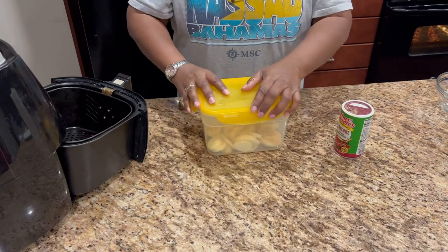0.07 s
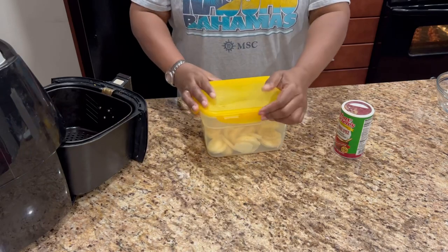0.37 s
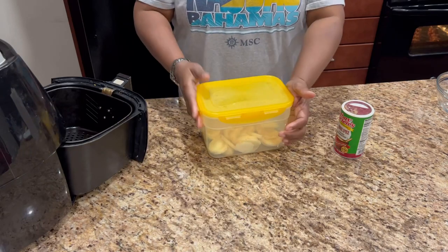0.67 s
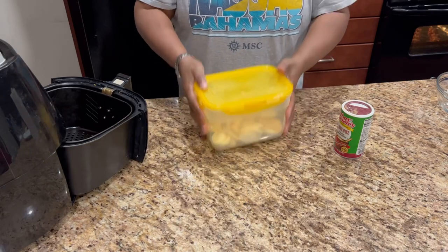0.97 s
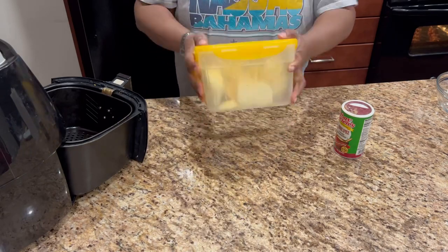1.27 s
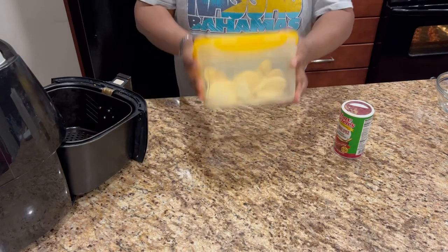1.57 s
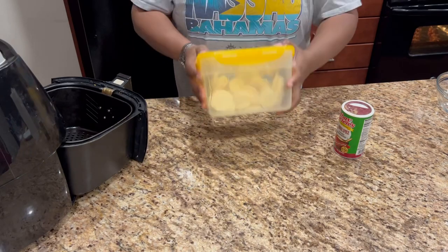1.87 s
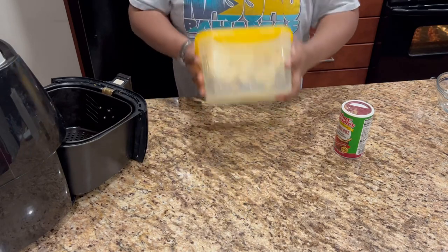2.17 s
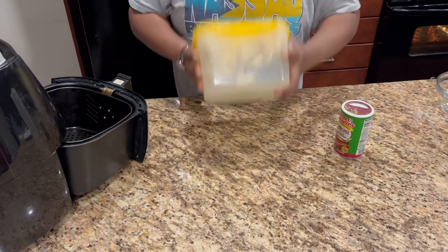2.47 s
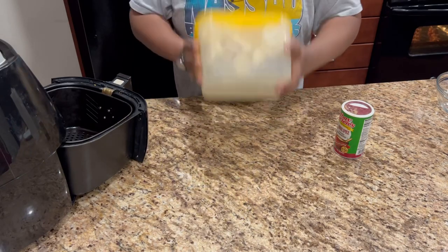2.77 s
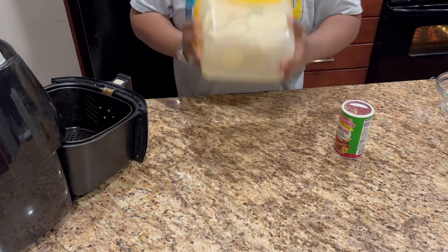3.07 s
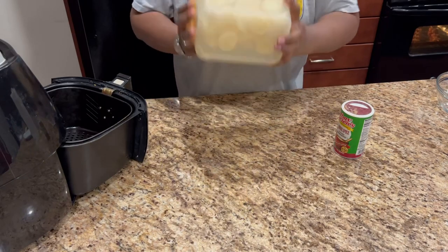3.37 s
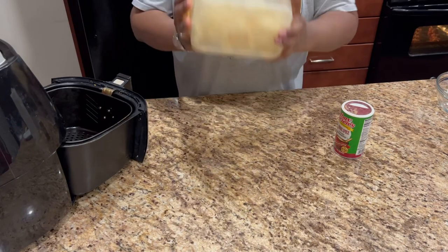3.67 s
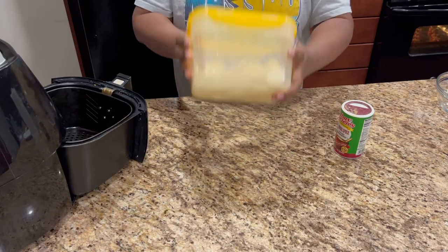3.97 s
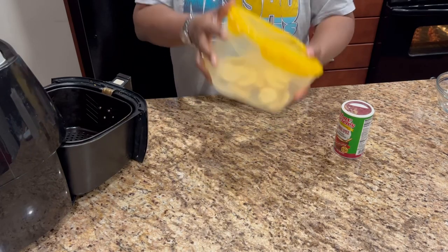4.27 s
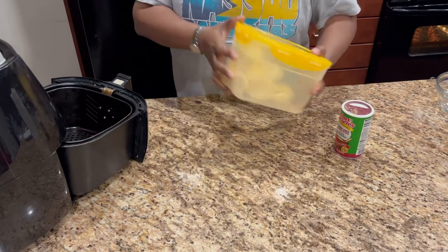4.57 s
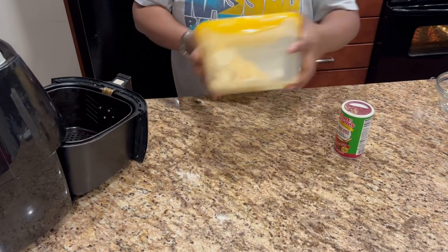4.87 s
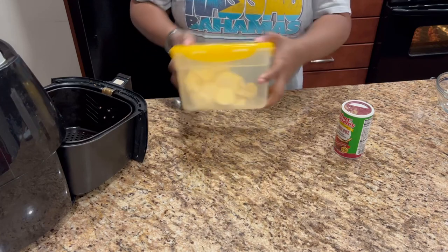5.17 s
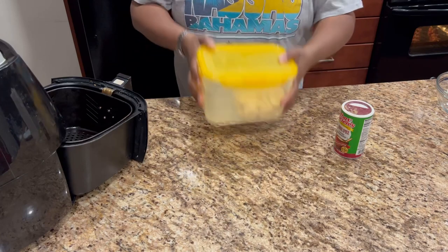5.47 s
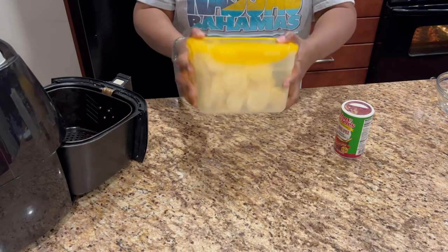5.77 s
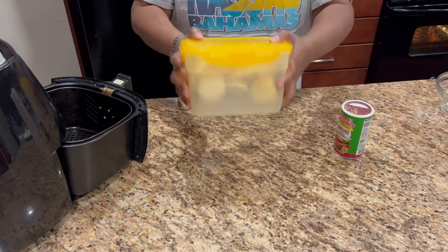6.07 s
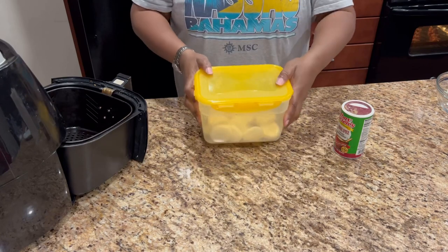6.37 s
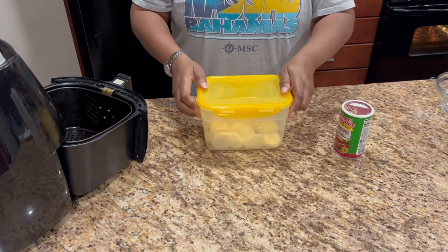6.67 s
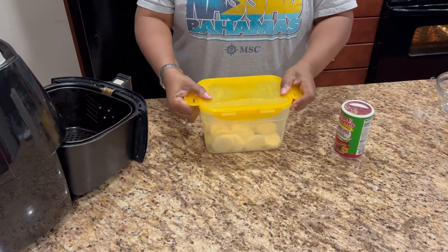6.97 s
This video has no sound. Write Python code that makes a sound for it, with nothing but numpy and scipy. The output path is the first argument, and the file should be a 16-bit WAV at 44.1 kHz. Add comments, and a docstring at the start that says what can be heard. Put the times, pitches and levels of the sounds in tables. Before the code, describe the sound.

Lid latches click closed, and damp chunks of food knock and tumble inside a hand-shaken plastic container, which is then set down.

```python
"""In a small, hard-walled kitchen, the four latches of a plastic food tub are snapped shut on the
counter. The tub is shaken by hand: moist chunks thump against its floor and lid about three times a
second, and tumble and squelch in between. Then it is set down and the latches are prised open.
Each thump is a plastic wall swinging; each clack is thin plastic flexing over the hollow tub.
The room rings behind it all, and appliances drone faintly."""
import sys
import numpy as np
from scipy import signal
from scipy.fft import rfft, irfft
from scipy.io import wavfile
from scipy.ndimage import uniform_filter1d

SR = 44100
rng = np.random.default_rng(int(sys.argv[2]) if len(sys.argv) > 2 else 0)


def int16_out(signal):
    """Quantize to a 16-bit WAV file."""
    q = np.round(np.clip(np.atleast_2d(signal).T, -1, 1) * 32767)
    wavfile.write(sys.argv[1], SR, q.astype(np.int16))


N = 309141
T = np.arange(SR // 6) / SR  # seconds within one hit

# Tone curves for the drone, the echo and the whole sound. Each row: frequency in Hz, gain in dB.
DRONE_TONE = [(25, -17), (58, 4), (85, -20), (145, 4.5), (250, -13), (470, 4.5), (700, -17.5), (1300, -17),
              (3000, -31.5), (7500, -29.5), (15000, -58)]
ECHO_TONE = [(60, -19.5), (100, -6.5), (135, 4.5), (185, 3.5), (228, 0), (262, -4), (320, -1.5), (420, 0.5),
             (700, -1), (1000, 0.5), (2000, 0.5), (3200, 3.5), (4300, 7), (5500, 7), (7500, -3.5),
             (14000, -5.5)]
OVERALL_TONE = [(20, -23), (60, 2.5), (7600, 2), (8700, 1.5), (9700, -16.5), (11000, -19.5),
                (13000, -9.5), (16000, -11.5)]
# Tone curves for food (slap, squelch) and plastic (knock, crack). Each row: frequency in Hz, gain in dB.
SLAP_TONE = [(60, -37), (300, -20), (700, 11.5), (1080, 1.5), (1320, 6), (1900, -4.5), (2700, -11.5),
             (4000, -19), (8000, -46)]
SQUELCH_TONE = [(1200, -15), (2800, 5.5), (4000, -2), (5500, 5.5), (7300, 13.5), (9000, 8), (15000, 5.5)]
KNOCK_TONE = [(250, -48), (600, -18.5), (950, 10.5), (1400, 7.5), (2000, 3), (2800, -5), (4500, -15.5)]
CRACK_TONE = [(1200, -15), (2000, -1), (2900, -8.5), (3800, -7), (4500, -5.5), (5300, -0.5), (6200, 3),
              (7300, 5), (8500, 3), (13000, -4), (16000, 2)]
# How long the kitchen rings. Each row: frequency in Hz, seconds to fade by 60 dB (called t60).
ECHO_TIMES = [(100, 0.5), (350, 0.33), (1000, 0.31), (3000, 0.38), (7000, 0.36), (14000, 0.14)]
# The notes the filled tub rings at. Each row: pitch in Hz, relative level in dB, t60 in seconds.
TUB_NOTES = [(135, -22.5, 0.19), (179.4, -18.5, 0.13), (222.9, -7, 0.099), (310.7, 1, 0.053),
             (372, 1, 0.035), (431.6, -5, 0.099), (528.3, -1, 0.064), (604.3, -5.5, 0.086),
             (746, 1.5, 0.012), (842, -10, 0.053), (1001, -20.5, 0.13), (1360, -29.5, 0.019)]
# Hand strokes that throw the food against the tub. Each row: landing time in seconds,
# landing length in seconds, relative level in dB, seconds of rolling beforehand.
HAND_STROKES = [(1.168, 0.057, -15.5, 0.0089), (1.447, 0.076, -19, 0.0064), (1.737, 0.1, -17, 0.038),
                (2.085, 0.11, -14.5, 0.072), (2.424, 0.11, -14, 0.044), (2.76, 0.089, -16.5, 0.2),
                (3.081, 0.13, -15, 0.11), (3.394, 0.088, -15.5, 0.041), (3.748, 0.097, -19, 0.092),
                (4.2, 0.093, -26.5, 0.032), (4.411, 0.051, -17.5, 0.02), (4.528, 0.046, -19, 0.032),
                (4.819, 0.011, -21.5, 0.027), (4.99, 0.053, -26, 0.015), (5.155, 0.0046, -18.5, 0.014),
                (5.339, 0.18, -33, 0.042), (5.659, 0.033, -21.5, 0.024), (5.75, 0.041, -18, 0.02),
                (5.85, 0.03, -33, 0.02), (5.96, 0.076, -18, 0.015), (6.06, 0.054, -15.5, 0.018),
                (6.181, 0.1, -24.5, 0.017)]
# Wet slices landing flat. Each row: start in seconds, relative crackle level in dB,
# relative slap level in dB, pitch of the trapped air in Hz.
WET_LANDINGS = [(2.038, -33, -34, 1390), (2.2166, -34, -30.5, 1510), (2.278, -38, -49, 1400),
                (2.32, -34, -35, 1170), (2.345, -27.5, -39, 1300), (2.5368, -24.5, -33, 1340),
                (2.7357, -24, -36, 1620), (3.3837, -28, -27, 1230), (3.4504, -27, -42, 1310),
                (3.554, -39, -36, 1500), (3.6913, -36, -35, 1320), (3.73, -28, -27, 1390),
                (4.2493, -33, -38, 1450), (4.2945, -45, -32, 1390), (4.421, -40, -31, 1350),
                (4.787, -41, -59, 1320), (4.825, -33, -40, 1300), (4.8433, -32, -29.5, 1320),
                (5.006, -37, -19, 1320), (5.253, -39, -49, 1390), (5.638, -56, -43, 1140),
                (5.6629, -49, -24, 1100), (5.7374, -40, -29, 1200), (5.962, -36, -27.5, 1500),
                (6.2712, -58, -36, 1180)]
# Dull blows from hands and heavy chunks. Each row: start in seconds, relative level in dB, wall pitch
# in Hz, slap strength in dB, length in wave cycles (the swell and the ring each take a share of it).
HEAVY_BLOWS = [(0.026, -18.5, 175, -34, 9.6), (0.117, -12.5, 253, -36, 8.3), (0.620, -39, 126, -27, 16),
               (0.9, -26, 303, -20, 15), (1.127, -25.5, 328, -28, 31), (1.168, -2, 327, -26.5, 33),
               (1.215, -9, 360, -21, 16), (1.261, -1.5, 478, -20.5, 17), (1.268, -6, 350, -13.5, 12),
               (1.291, -17.5, 436, -6, 19), (1.3, -19, 385, -19, 13), (1.448, -5.5, 475, -21, 13),
               (1.466, -11.5, 550, -12.5, 16), (1.525, -2.5, 468, -14, 16.4), (1.547, -10, 404, -9, 30),
               (1.634, -18, 335, -31, 15), (1.674, -21.5, 373, -30, 16), (1.711, -20, 410, -15, 36),
               (1.733, -2.5, 366, -22, 30), (1.752, -5.5, 386, -24, 13), (1.803, -5, 506, -23, 13),
               (1.818, -7.5, 335, -23, 15), (1.852, -3.5, 509, -18.5, 14), (1.865, -7.5, 372, -19.5, 21),
               (1.895, -17, 417, -29, 14), (2.033, -14, 333, -17.5, 24), (2.051, -18.5, 365, -19, 37),
               (2.078, -7.5, 423, -21, 19), (2.092, -9, 627, -25.5, 22), (2.099, -6, 362, -46, 26),
               (2.12, -10, 350, -33, 50), (2.159, -7, 374.4, -16.5, 20), (2.18, -10.5, 496, -10, 9.8),
               (2.192, -14, 423, -26, 12), (2.215, -15, 395, -12, 13), (2.237, -15, 520, -18, 13),
               (2.349, -19, 414, -15, 27), (2.377, -20.5, 360, -13, 20), (2.419, -11, 276, -10, 14),
               (2.430, -5, 355, -23, 15), (2.473, -2.5, 455, -18.5, 16), (2.496, -9.5, 408, -30, 35),
               (2.521, -11.5, 406, -11.5, 30), (2.536, -10, 375, -11, 25), (2.657, -12.5, 383, -15, 14),
               (2.698, -15, 333, -20.5, 20), (2.746, -7, 334, -21, 16.6), (2.768, -14.5, 290, -33, 31),
               (2.792, -8.5, 498, -13, 20), (2.813, -7, 433, -11.5, 25), (2.840, -7.5, 405, -19.5, 28),
               (2.854, -6, 392, -15, 20), (2.868, -12.5, 440, -18, 8.6), (3.019, -21, 476, -16, 20),
               (3.072, -11, 370, -32.5, 23), (3.085, -10.5, 430, -15, 17), (3.101, -13.5, 520, -15, 18),
               (3.127, -8.5, 446, -24.5, 38), (3.158, -11, 435, -17.5, 9), (3.181, -10.5, 383, -31, 31),
               (3.21, -15.5, 522, -10, 15), (3.277, -23, 430, -12, 15), (3.326, -17, 322, -23.5, 60),
               (3.401, -12.5, 387, -19.5, 25), (3.437, -14.5, 371, -37, 26), (3.460, -10, 396, -18, 22),
               (3.473, -9, 440, -17, 29), (3.495, -15, 450, -9, 12), (3.51, -7, 331, -20.5, 31.5),
               (3.551, -23, 423, -8, 27), (3.694, -16, 332, -23.5, 32), (3.749, -13, 365, -15, 15),
               (3.798, -5.5, 460, -19, 19), (3.815, -12.5, 478, -8.5, 26), (3.841, -4.5, 359, -16, 29),
               (3.862, -16.5, 455, -11.5, 18), (3.903, -24.5, 407, -13.5, 13), (4.143, -29.5, 316, -35, 25),
               (4.203, -18.5, 431, -34, 29), (4.271, -18.5, 370, -16, 20), (4.297, -16, 371, -22.5, 18),
               (4.316, -21, 300, -24.5, 15), (4.404, -16, 296, -33, 16), (4.432, -10.5, 365, -26, 22),
               (4.452, -16, 371, -10.5, 33), (4.535, -10.5, 585, -11, 32), (4.544, -8.5, 425, -21, 27),
               (4.565, -12, 380, -16, 20), (4.622, -21, 408, -12, 25), (4.636, -11, 363, -19, 33),
               (4.835, -19, 478, -6.5, 34), (4.979, -17.5, 328, -25, 21), (5.003, -15.5, 455, -24, 27),
               (5.012, -13, 463, -12, 11.5), (5.159, -15, 413, -14, 16), (5.281, -28, 325, -41, 24),
               (5.311, -24.5, 354, -34, 18), (5.379, -21, 412, -11, 26), (5.393, -17, 448, -11, 45),
               (5.432, -20, 378, -32, 42), (5.59, -24.5, 405, -17.5, 16), (5.641, -23, 333, -28, 43),
               (5.66, -20.5, 650, -12, 13), (5.673, -15.5, 780, -20.5, 19), (5.683, -16.5, 580, -14.5, 19),
               (5.751, -13.5, 448, -17.5, 22), (5.77, -11.5, 434, -13.5, 26), (5.793, -16, 430, -25, 21),
               (5.838, -16, 440, -20, 13), (5.857, -11, 325, -23.5, 14), (5.869, -16.5, 442, -17, 24),
               (5.898, -18, 372, -18, 25), (5.939, -17, 420, -21, 21), (5.968, -10, 343, -30, 12),
               (5.986, -15.5, 565, -14.5, 11), (5.999, -14.5, 407, -22.5, 16), (6.054, -10, 397, -24, 22),
               (6.068, -5, 392, -21.5, 18), (6.177, -16, 394, -33, 7.9), (6.245, -23.5, 417, -17, 25),
               (6.271, -25.5, 497, -13.5, 20), (6.534, -24.5, 474, -27, 11), (6.745, -19, 417, -35, 29),
               (6.947, -19, 475, -15, 13)]
# Clacks of latches, lid and base. Each row: start in seconds, body level in dB, body pitch in Hz,
# relative knock and crack levels in dB, contact time in seconds, left minus right in dB,
# extra dB towards the microphones, and a list of ringing notes as (Hz, dB compared with the snap).
PLASTIC_CLACKS = [(0.026, -10, 445, -24.5, -25, 0.0071, 1, 0.5, [(1900, -1), (3300, 0.5), (7400, 1)]),
                  (0.114, -11, 444, -24.5, -26.5, 0.013, 1.5, 1.5, [(2650, 2.5), (4600, 3.5), (6500, 4.5),
                  (7150, 4)]), (0.349, -26, 565, -34.5, -39, 0.089, 6, -11, []),
                  (0.389, -6.5, 456, -15, -21.5, 0.0088, -1, -0.5, [(1850, -11), (3800, 1), (5150, -2.5),
                  (7400, 2)]), (0.6175, -12, 530, -21.5, -22, 0.0085, 4, -5.5, [(800, 4.5), (2550, 4),
                  (3050, 7), (3950, -6), (7400, -15.5)]),
                  (1.52, -21.5, 460, -25, -38, .018, -2.5, -2.5, [(2100, -3.5)]),
                  (2.135, -8, 446, -32.5, -43.5, 0.03, -2, 3, []),
                  (2.801, -12, 385, -29.5, -43.5, 0.027, -1, 2, []),
                  (3.137, -11, 335, -26.5, -34.5, 0.01, 0, 0.5, [(6840, -2)]),
                  (3.742, -15, 290, -32, -45, 0.02, -5, -1, [(1230, -10.5)]),
                  (4.162, -29, 247, -38.5, -42.5, 0.0095, 0.5, 0, [(5100, 3)]),
                  (4.529, -7, 439, -28.5, -35.5, 0.012, 2, 0.5, [(3950, 9.5), (7300, -1)]),
                  (5.127, -38, 366, -47, -46.5, 0.046, 0, -6, []),
                  (5.341, -23, 380, -38, -52, 0.01, -2, -4, []),
                  (6.09, -13.5, 307, -21.5, -48, 0.01, -1, -5, [(5400, 2)]),
                  (6.11, -15.5, 320, -38.5, -54, 0.01, 2, 9.5, [(5650, 14), (6400, 7.5)]),
                  (6.505, -15.5, 345, -34.5, -42.5, 0.01, 1, -3.5, [(7700, 4)]),
                  (6.736, -32.5, 394, -48, -44, 0.013, 0, -0.5, [(1900, 17.5), (7500, -8)]),
                  (6.929, -13, 594, -35.5, -49.5, 0.0055, -3, 0, [(3300, -1), (7600, 8.5)]),
                  (6.947, -30, 470, -35.5, -50.5, 0.03, -1, 2.5, [])]

SHAKING_S = (1.11, 6.42)  # when the loose pieces start and stop


def undb(db):
    """Turn decibels into a number to multiply by."""
    return np.exp(np.log(10) * np.asarray(db) / 20)


def fade(t, t60):
    """Die away by 60 dB each time t grows by t60."""
    return np.exp(-np.log(1000) * t / t60)


def unit(x):
    """Scale each row to an energy of 1."""
    return x / np.sqrt(np.sum(x ** 2, axis=-1, keepdims=True))


def scatter(shape):
    """Bell-curve random numbers, kept between -2 and 2."""
    return np.clip(rng.standard_normal(shape), -2, 2)


def place(times, sounds):
    """Lay one sound at each time, given in seconds."""
    out = np.zeros(N + len(T))
    for s, sound in zip(times, sounds):
        i = int(np.clip(s * SR, 0, N))
        out[i:i + len(T)] += sound
    return out[:N]


def colour(x, tone, size=2048):
    """Filter each row with a tone curve of (Hz, dB) points."""
    hz, db = np.transpose(tone)
    f = np.maximum(np.fft.rfftfreq(size, 1 / SR), 1)
    gain = undb(np.interp(np.log(f), np.log(hz), db))
    # fold the filter forward in time, so nothing sounds before its hit
    cepstrum = irfft(np.log(gain))
    cepstrum[1:size // 2] *= 2
    cepstrum[size // 2 + 1:] = 0
    response = irfft(np.exp(rfft(cepstrum)))
    return signal.fftconvolve(x, response[None], axes=-1)[:, :x.shape[-1]]


def resonate(x, notes, width_hz):
    """Make a hit ring at each (Hz, dB) note."""
    f = np.fft.rfftfreq(len(T), 1 / SR)
    rings = sum(undb(db) / (1 + 2j * (f - hz) / width_hz) for hz, db in notes)
    return irfft(rfft(x) * (1 + rings), len(T))


def stereo_noise(length, apart_hz):
    """Noise at two close microphones: alike in the bass, unrelated in the treble."""
    mid, side = rng.standard_normal((2, length))
    alike = .9 / (1 + (np.fft.rfftfreq(length, 1 / SR) / apart_hz) ** 2)
    mid = irfft(rfft(mid) * np.sqrt(1 + alike), length)
    side = irfft(rfft(side) * np.sqrt(1 - alike), length)
    return np.array([mid + side, mid - side]) / np.sqrt(2)


def appliance_drone():
    """The kitchen's appliances give a faint, steady drone."""
    return unit(colour(stereo_noise(N, apart_hz=900), DRONE_TONE)) * np.sqrt(N) * undb(-50.0)


def even_out(tail):
    """Level an echo's frequencies, so that no single note hangs on."""
    spectrum = rfft(tail, 2 * tail.shape[-1])
    power = uniform_filter1d(np.abs(spectrum) ** 2, size=32)
    return irfft(spectrum / np.sqrt(power))[:, :tail.shape[-1]]


def kitchen_echo(x, build_s=0.0033):
    """Counter, cupboards and walls send back a dense echo that builds up in a few milliseconds."""
    t = np.arange(SR * 2 // 3) / SR
    f = np.fft.rfftfreq(len(t), 1 / SR)
    spectrum = rfft(stereo_noise(len(t), apart_hz=1000))
    centres = np.log([hz for hz, _ in ECHO_TIMES])
    tail = 0
    for band, (_, t60) in zip(np.eye(len(centres)), ECHO_TIMES):
        band_noise = irfft(spectrum * np.interp(np.log(f + 1), centres, band), len(t))
        tail = tail + band_noise * fade(t, t60)
    swell = 1 - np.exp(-(t / build_s) ** 2)
    tail = colour(unit(even_out(tail * swell) * swell), ECHO_TONE)
    return signal.fftconvolve(x[None], tail, axes=-1)[:, :N]


def bursts(db, tone, t60, rise_s, grain_db):
    """One short noise per level: it swells as a piece flattens and crackles as the wet film parts."""
    noise = rng.standard_normal((len(db), len(T)))
    grains = undb(grain_db * np.minimum(rng.exponential(size=noise.shape), 5.5))
    burst = noise * grains * fade(T, t60) * (1 - np.exp(-T / rise_s))
    return unit(colour(burst, tone)) * undb(db)[:, None]


def spot_ring(sounds, low_hz, high_hz, ring_db, width_hz):
    """Each hit lands on another spot, which adds two notes of its own. Each comes out with energy 1."""
    spots_hz = low_hz + (high_hz - low_hz) * rng.random((len(sounds), 2))
    rung = [resonate(x, [(hz, ring_db) for hz in spot], width_hz) for x, spot in zip(sounds, spots_hz)]
    return unit(np.array(rung))


def struck_note(hz, rise_cycles, ring_cycles, bend):
    """A wall or air pocket swings up and dies away. A positive bend slides down to hz, a negative up."""
    age = hz[:, None] * T  # in cycles
    swing = (1 - np.exp(-(age / rise_cycles) ** 2)) * fade(age, ring_cycles)
    cycles = age + bend * (1 - np.exp(-age / rise_cycles))
    return np.sin(2 * np.pi * cycles, dtype=np.float32) * swing / swing.max(axis=-1, keepdims=True)


def tub_ring(count, rise_s=0.0022, detune=0.034):
    """The whole tub rings; each new spot and shift of the food changes its notes' strength and tuning."""
    out = 0
    for hz, db, t60 in TUB_NOTES:
        weight, shift = rng.standard_normal((count, 2)).T[:, :, None]
        note = np.sin(2 * np.pi * hz * (1 + detune * shift) * T, dtype=np.float32)
        out = out + undb(db) * weight * note * fade(T, t60)
    return out * (1 - np.exp(-T / rise_s))


def shake_moments(count, rolling_db=-6, start_db_per_s=890.5, settle_db_per_s=272):
    """Random times during the shaking, and the food's level at each: it rolls, lands, then settles."""
    first, last = SHAKING_S
    s = first + (last - first) * (np.arange(count) + rng.random(count)) / count
    lands, length, db, rolls = np.transpose(HAND_STROKES)[:, :, None]
    rolling = rolling_db - start_db_per_s * np.maximum(lands - rolls - s, 0)
    landing = -start_db_per_s * np.maximum(lands - s, 0)
    settling = settle_db_per_s * np.maximum(s - lands - length, 0)
    return s, np.max(db + np.maximum(rolling, landing) - settling, axis=0)


def unsticking(count=180):
    """Moist pieces peel off the walls and each other with tiny, pitched ticks."""
    s, db = shake_moments(count)
    tick_db = -11 + 1.05 * db + 0.5 * scatter(count)
    ticks = bursts(tick_db, SQUELCH_TONE, t60=0.02, rise_s=0.003, grain_db=4.5)
    ticks = spot_ring(ticks, low_hz=2200, high_hz=8200, ring_db=6.5, width_hz=500)
    return place(s, ticks * undb(tick_db)[:, None])


def tumble(count=250, middle_hz=451, spread_octaves=0.462):
    """Small pieces patter about at random, each with its own pitch and a light, damp tap."""
    s, db = shake_moments(count)
    db = db - 3 * rng.exponential(size=count)
    hz = middle_hz * 2 ** (spread_octaves * scatter(count))
    knocks = struck_note(hz, rise_cycles=0.46, ring_cycles=23.7, bend=0.16) * undb(db + 1.5)[:, None]
    tap_db = db + 3 * rng.standard_normal(count) + 4.0
    taps = bursts(tap_db, SLAP_TONE, t60=0.04, rise_s=0.0011, grain_db=2.0)
    return place(s, knocks + taps)


def smacks():
    """A wet slice lands flat: moisture crackles, the slice slaps and the air trapped under it pops."""
    s, wet_db, slap_db, pocket_hz = np.transpose(WET_LANDINGS)
    crackle = bursts(wet_db + 8.5, SQUELCH_TONE, t60=0.024, rise_s=0.002, grain_db=5)
    slaps = bursts(slap_db + 14.0, SLAP_TONE, t60=0.073, rise_s=0.00083, grain_db=0.5)
    pops = struck_note(pocket_hz, rise_cycles=1.2, ring_cycles=24, bend=-0.52)
    return place(s, crackle + slaps + pops * undb(slap_db - 0.5)[:, None])


def squelch(db, spurt_db=6, spurt_samples=110):
    """Moisture is squeezed out in uneven spurts of a few milliseconds, through gaps that ring."""
    wet = bursts(db, SQUELCH_TONE, t60=0.074, rise_s=0.009, grain_db=3)
    spurts = scatter((len(db), len(T) // spurt_samples + 1))
    spurts = np.repeat(spurts, spurt_samples, axis=1)[:, :len(T)]
    wet = wet * uniform_filter1d(undb(spurt_db * spurts), size=spurt_samples // 3)
    return spot_ring(wet, low_hz=2020, high_hz=8000, ring_db=7, width_hz=460) * undb(db)[:, None]


def slap(db):
    """The flat side of a chunk slaps the plastic."""
    slaps = bursts(db, SLAP_TONE, t60=0.071, rise_s=0.0013, grain_db=3.5)
    return spot_ring(slaps, low_hz=720, high_hz=2050, ring_db=-1, width_hz=240) * undb(db)[:, None]


def chunks(s, db, hz, slap_db, length_cycles):
    """Soft, heavy chunks push one wall, ring the tub, slap and squelch. A long push swells slowly."""
    length = np.maximum(length_cycles, 5)[:, None]
    wall = struck_note(hz, rise_cycles=0.057 * length, ring_cycles=0.68 * length, bend=0.2)
    body = undb(-4.0) * wall + undb(-9.5) * tub_ring(len(s))
    slaps = slap(db + slap_db + 22.5)
    # a flat side traps a pocket of air, which gives a brief hollow pop
    pocket_hz = 1150 * 2 ** rng.uniform(-0.81, 0.738, len(s))
    pops = struck_note(pocket_hz, rise_cycles=2.9, ring_cycles=7.7, bend=-0.48)
    pops = pops * undb(db + slap_db - 4.0)[:, None]
    wet = squelch(db + 0.43 * slap_db - 3.5)  # a flatter landing squeezes out more moisture
    return place(s, body * undb(db)[:, None] + slaps + pops + wet)


def heap(count=160, middle_hz=370, spread_octaves=0.41):
    """Most of the chunks land at random, as hard as the stroke throws them."""
    s, stroke_db = shake_moments(count)
    weight, spot, flatness = scatter((count, 3)).T
    db = stroke_db - 2.5 + weight
    hz = middle_hz * 2 ** (spread_octaves * spot)
    slap_db = -16.5 + 6 * np.minimum(flatness, 1)
    return chunks(s, db, hz, slap_db, length_cycles=np.full(count, 15.4))


def thumps():
    """Hands on the lid and the heaviest chunks strike the tub one by one."""
    return chunks(*np.transpose(HEAVY_BLOWS))


def plastic_flex(db, tone, contact_s, lag_s, scrape_db):
    """Thin plastic is pushed: lows travel slower than highs, and the edge scrapes while it touches."""
    f = np.fft.rfftfreq(len(T), 1 / SR)
    push = np.exp(-4j * np.pi * lag_s * np.sqrt(1000 * f))  # lag_s is the delay at 1000 Hz
    contact = contact_s[:, None]
    noise = rng.standard_normal((len(db), len(T)))
    scrape = unit(noise * fade(T, contact) * (1 - np.exp(-T / (0.27 * contact))))
    spectrum = push + undb(scrape_db) * rfft(scrape)
    # this plastic hardly rings, so flatten any narrow peaks
    for _ in range(5):
        even = irfft(spectrum / np.abs(spectrum), len(T)) * fade(T, .1)
        spectrum = rfft(even)
    return unit(colour(even, tone)) * undb(db)[:, None]


def clacks(lid_hz=436.2, lid_db=-15.5, lid_t60=0.16):
    """Plastic cracks and knocks, then the hollow tub answers. Gives the direct sound and the room's."""
    numbers = np.transpose([row[:-1] for row in PLASTIC_CLACKS])
    s, body_db, hz, knock_db, crack_db, contact_s, pan_db, facing_db = numbers
    crack = plastic_flex(crack_db + 29.0, CRACK_TONE, contact_s, lag_s=0.001236, scrape_db=16.0)
    knock = plastic_flex(knock_db + 24.5, KNOCK_TONE, 5.9 * contact_s, lag_s=0.001646, scrape_db=10)
    snap = np.array([resonate(x, row[-1], width_hz=510) for x, row in zip(crack + knock, PLASTIC_CLACKS)])
    # so short a push hardly stirs the tub's low notes
    shell = colour(tub_ring(len(s)), [(200, -8.0), (400, 3.0), (520, -10.0), (650, 4)])
    wall = struck_note(hz, rise_cycles=0.75, ring_cycles=9.8, bend=0.24)
    # the stretched lid hums on like a drumhead
    lid = undb(lid_db) * np.sin(2 * np.pi * lid_hz * T) * fade(T, lid_t60) * (1 - T / T[-1])
    body = wall + undb(-8.0) * shell + lid
    hollow = place(s + 0.0017, body * undb(body_db)[:, None])
    sides = undb(facing_db + np.outer([1, -1], pan_db) / 2)[:, :, None]
    direct = np.array([place(s, snap * side) for side in sides]) + hollow
    into_room = place(s, snap) + hollow
    return direct, into_room


def scene():
    """The tub is just left of centre: its sound is a little earlier and brighter on that side."""
    food = thumps() + smacks() + heap() + tumble() + unsticking()
    snaps, snaps_into_room = clacks()
    near = food + snaps
    left = colour(near[:1], [(150, 3.0), (450, 1.1), (1300, -1.0), (4000, 7.0), (9000, -3.5)])[0]
    right = colour(near[1:], [(150, 4.5), (450, 0.1), (1300, 0.4), (4000, 0.0), (9000, -0.3)])[0]
    right = np.concatenate([np.zeros(2), right[:-2]])  # two samples late
    echo = kitchen_echo(food + snaps_into_room) * undb([[-3.7], [-4.5]])
    return np.array([left, right]) + echo + appliance_drone()


def record(dry, top_hz=16100):
    """The highest treble is dulled, and the loudest peaks are rounded off."""
    heard = colour(dry, OVERALL_TONE)
    rounded = heard / (1 + heard ** 6) ** (1 / 6)
    treble_cut = signal.ellip(8, .2, 70, top_hz, fs=SR, output="sos")
    return signal.sosfilt(treble_cut, rounded)


dry = scene()
out = record(dry)
int16_out(out)
```